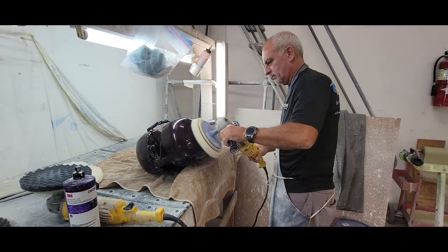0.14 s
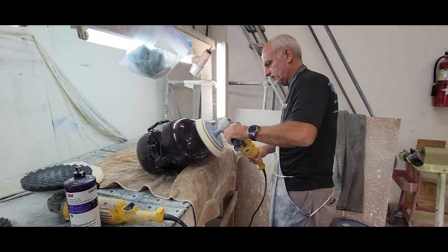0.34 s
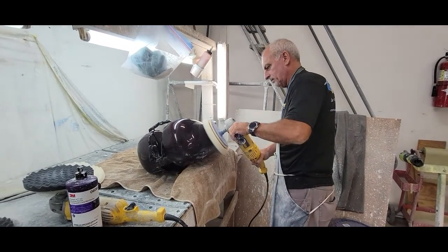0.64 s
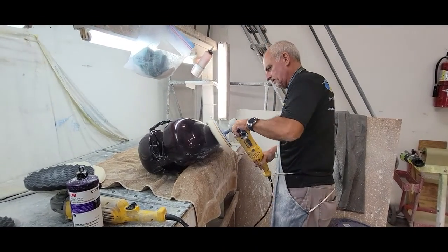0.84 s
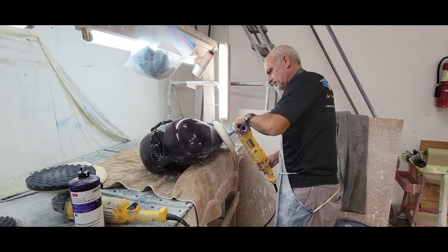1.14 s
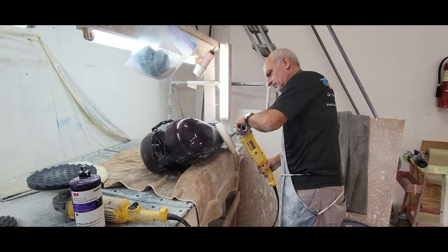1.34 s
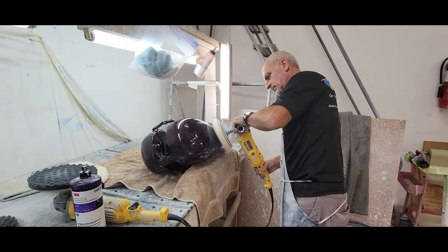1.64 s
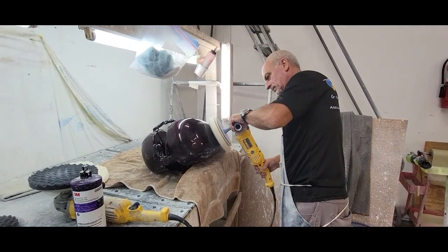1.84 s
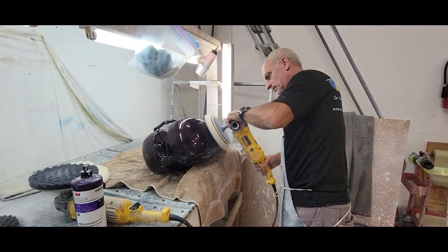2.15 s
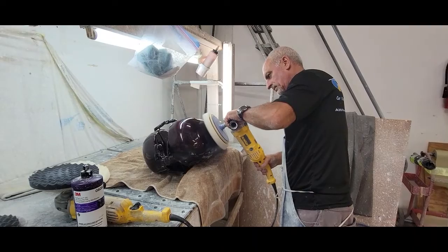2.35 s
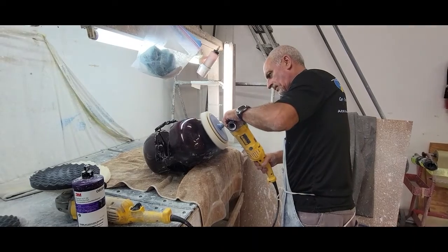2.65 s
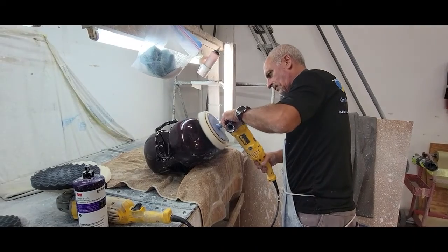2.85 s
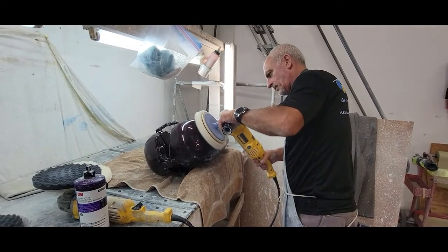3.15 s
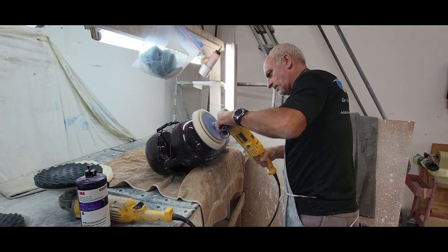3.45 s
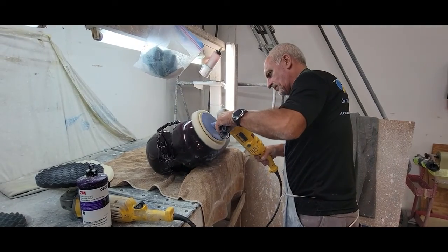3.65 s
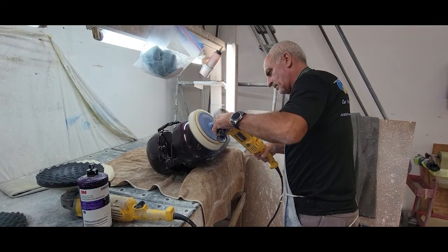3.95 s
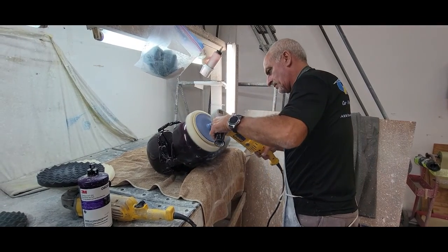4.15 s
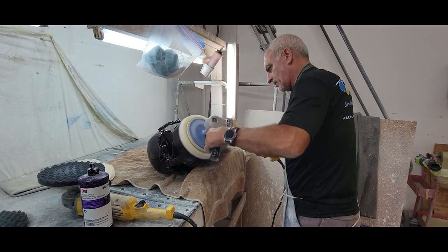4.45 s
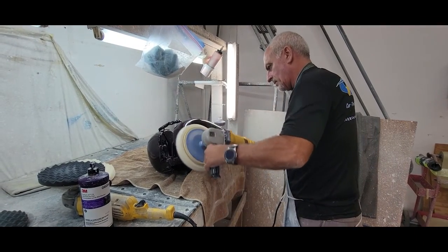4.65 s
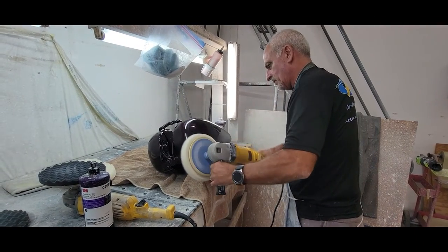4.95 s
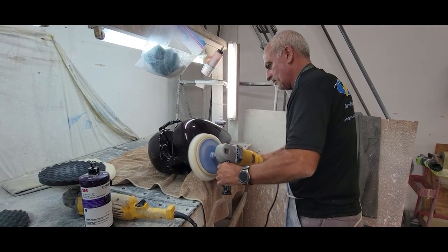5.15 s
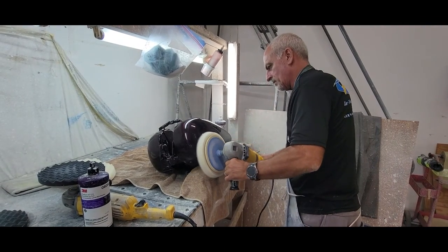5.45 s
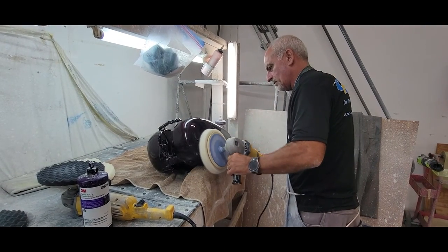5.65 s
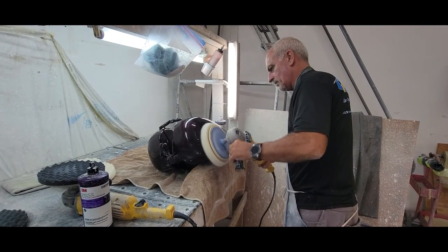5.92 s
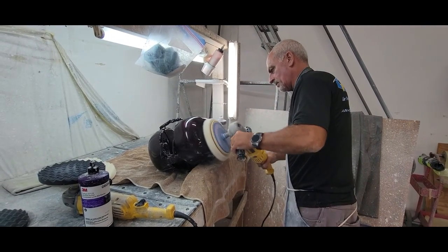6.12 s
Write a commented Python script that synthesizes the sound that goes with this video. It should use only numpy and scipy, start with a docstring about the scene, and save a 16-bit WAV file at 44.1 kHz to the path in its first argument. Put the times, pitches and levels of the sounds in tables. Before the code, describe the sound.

An electric rotary buffer is already running at full speed and continues to the cut at about 6.3 seconds. Its nasal whine, around 1250 hertz, rides on broad cooling-air rush, rough gear whir, faint low rumble and soft foam hiss that flutters rapidly with the pad. From 0 to 2 seconds the motor sags a little, recovers and sags again, the whine swelling near 1.5. Around 2.6 it almost vanishes, leaving air, a thin high whistle and a faint shell ring, then returns strongly by 3.1. From 3.3 speed climbs slightly and a second, higher whine stands out until about 4.4. As the tool swings toward the listener, gear noise thickens and a low hum swells near 4.9; speed peaks again around 5.1 to 5.4, then eases. Small hard-walled workshop, stereo microphone fairly near, tones shifting from side to side with wall reflections.

```python
"""A rotary buffer works on a painted metal shell in a small workshop; motor whine, air rush and foam hiss throughout.
0-2 s: the tool turns side-on, the motor sags under load, the main whine swells near 1.5 s.
2-4 s: the whine almost vanishes near 2.6 s and returns; speed climbs; the second whine is strong from 3.3 s.
4-6.3 s: the tool swings to face the listener, the low drone swells near 4.9 s, the speed peaks again and sags.
Tones are multiples of rotor speed with moving wall echoes; air, gears, foam and shell are shaped noise."""
import sys
import numpy as np
from scipy import signal
from scipy.fft import rfft, irfft, next_fast_len
from scipy.io import wavfile
from scipy.ndimage import map_coordinates

SR = 44100
rng = np.random.default_rng(int(sys.argv[2]) if len(sys.argv) > 2 else 0)


def to_wav(s):
    """Save 16-bit WAV."""
    ch = np.atleast_2d(s).T  # columns
    pcm = np.round(np.clip(ch, -1, 1) * 32767)  # PCM
    wavfile.write(sys.argv[1], SR, pcm.astype(np.int16))


N = 276948
TIME_S = np.arange(N) / SR
RIPPLE_HZ, ROTOR_HZ = 120, 208.5  # mains ripple; reference rotor speed
PAD_GEARING = 16.2  # rotor turns per pad turn
CUTOFF_HZ = 15750

# Levels are relative: layer trims may follow.
# motor speed as the pad is pressed: time_s, rotor_hz
SPEED = [(0.0, 207.3), (0.45, 205.4), (1.0, 206.9), (1.4, 209.8), (1.68, 205.7), (2.03, 204.2),
         (2.45, 205.1), (3.0, 207.4), (3.28, 211.4), (3.75, 212.4), (4.05, 211.2), (4.2, 209.9),
         (4.75, 208.9), (5.08, 212.0), (5.36, 211.9), (5.95, 208.5), (6.28, 208.2)]
# tool attitude: time_s, facing (0 side-on, 1 to the listener)
FACING = [(0.0, 0.46), (0.6, 0.29), (1.2, 0.057), (2.3, 0.029), (3.3, 0.2), (4.5, 0.47), (5.05, .97),
          (5.75, 1), (6.28, 0.61)]
# magnetic hum: ripple_multiple, level_db
HUM = [(1, -19.5), (2, -12.5), (3, -0.5), (4, -15.5), (5, -15)]
# low drone: time_s, level_db
DRONE = [(0.0, -44), (0.25, -43.5), (0.7, -56), (1.2, -45), (2.6, -47.5), (3.2, -43.5), (3.9, -55),
         (4.9, -37), (5.3, -43), (5.8, -38), (6.28, -44.5)]
# low shell resonances: centre_hz, half_width_hz, level_db
SHELL_MODES = [(332, 7, 3), (367, 27, -3.5), (306, 5.3, -6)]
# rubbed shell resonances: centre_hz, half_width_hz, level_db
RUB_MODES = [(453.5, 13.4, 2), (409.6, 3.4, -2.5)]
# shell ringing under the pad: time_s, level_db
SHELL_RING = [(0.0, -51), (1.3, -45), (2.0, -40.5), (2.65, -38.5), (3.2, -48), (6.28, -46.5)]
# scuffing foam resonances: centre_hz, half_width_hz, level_db
SCUFF_MODES = [(548, 100, -0.5), (735, 32, -2.5), (848, 41, -0.5)]
# pad rumble spectrum: freq_hz, density_db
RUMBLE = [(20, -22), (35, -19), (50, -1), (62, -4), (78, 2), (98, -8), (130, -6), (170, -12.5), (260, -5),
          (600, -15.5)]
# foam hiss spectrum: freq_hz, density_db
HISS = [(2500, -13), (4400, 1.5), (5300, 1), (6800, 2), (8000, -2.5), (10000, -12.5), (12500, -22)]
# finest foam sizzle spectrum: freq_hz, density_db
SIZZLE = [(7500, -6), (9500, 2), (12500, 1.5), (15500, -0.5)]
# gear resonances: centre_hz, half_width_hz, level_db
GEAR_MODES = [(1017, 70, 6), (1198, 41, 2.5), (1463, 19, -1)]
# cooling air spectrum: freq_hz, density_db
AIR = [(200, -20), (350, -22.5), (600, -12), (850, -13.5), (1100, 3.5), (1500, 0), (1800, -4.5), (2400, 1),
       (3000, -0.5), (3600, -2.5), (4100, -6), (4800, -16), (7000, -34)]
# low, middle, high vent resonance groups, each: centre_hz, half_width_hz, level_db
VENT_MODES = [
    [(2293, 158, -1), (2050, 54, -16)],
    [(2720, 150, 4), (2860, 66, -10)],
    [(3470, 160, 0)],
]
# one row per vent group: side_on_db, facing_gain_db, speed_gain_db_per_hz
VENT_LEVELS = [(-29, -8, -0.2), (-33, 2, 1.05), (-45.5, 15.5, -0.6)]
# weak rotor, gear and commutator tones: rotor_order, level_db
WEAK_ORDERS = [(4, -47.5), (8, -45), (10, -46), (14, -50), (15, -35), (16, -43.5), (24, -49), (31, -70),
               (42, -69), (72, -63)]
# overtones that follow the tool: rotor_order, side_on_db, facing_gain_db, speed_gain_db_per_hz
TURNING = [(11, -29, -16, -0.3), (13, -37, 8.5, 0.2)]
# low whine, order 5: time_s, level_db
LOWER_WHINE = [(0.0, -47), (1.85, -24), (2.4, -51), (3.1, -24), (3.45, -47), (4.6, -48), (5.3, -24.5),
               (6.28, -27.5)]
# second whine, order 7: time_s, level_db
UPPER_WHINE = [(0.0, -30), (1.05, -26), (1.5, -23), (2.95, -28.5), (3.3, -18.5), (3.7, -17), (4.4, -20),
               (5.1, -26), (5.4, -48), (5.8, -21), (6.28, -19.5)]
# octave of the main whine, order 12: time_s, level_db
OCTAVE = [(0.0, -38), (0.3, -21), (0.7, -36), (1.55, -24), (1.95, -19), (3.25, -37.5), (3.62, -20),
          (4.4, -27), (6.28, -34)]
# high whistle, order 18: time_s, level_db
WHISTLE = [(0.0, -36), (0.68, -27.5), (1.15, -36), (2.42, -38), (2.65, -20.5), (2.92, -18.5), (3.22, -47),
           (4.0, -26.5), (6.28, -40)]
# main whine, order 6, crossing standing waves: time_s, left_db, right_db, left_lead_rad
WHINE = [(0.0, -19, -16, 1.05), (0.42, -23, -18, 1.3), (0.66, -20, -21.5, 1.85), (0.8, -19, -32, 3),
         (1.02, -20, -32, 5), (1.2, -22.5, -33, 1.5), (1.46, -14, -19, 2.25), (1.7, -23.5, -25, 2.1),
         (1.84, -24, -17.3, -2.15), (2.06, -19, -14.5, -2.0), (2.28, -35, -25.5, -4), (2.6, -42, -32.5, 0),
         (2.75, -20.5, -22, 1.2), (3.1, -14.3, -13, 1.28), (3.35, -18, -25.5, 0.76),
         (3.95, -28, -16.5, 1.24), (4.7, -31, -20.5, -1.8), (5.12, -32, -14.3, -4.5),
         (5.45, -22.5, -26, -4.5), (5.68, -21.5, -24, -4.5), (6.02, -28, -24, -5), (6.28, -22, -18, -6)]
# mains sideband below the main whine: time_s, level_db
LOWER_SIDEBAND = [(0.0, -43), (0.75, -41), (1.42, -18.5), (1.9, -34), (2.8, -29), (4.15, -54),
                  (4.55, -26.5), (5.2, -22.5), (6.28, -34)]
# mains sideband above the main whine: time_s, level_db
UPPER_SIDEBAND = [(0.0, -34), (0.7, -25.5), (1.4, -32), (1.8, -36), (3.1, -31), (3.5, -27), (4.5, -24),
                  (5.2, -40), (6.28, -28)]


def from_db(db):
    """Decibels to amplitude gain."""
    return 10 ** (np.asarray(db) / 20)


def rms_one(x):
    """Scale to unit rms."""
    return x / np.sqrt(np.mean(np.abs(x) ** 2) + 1e-20)


def in_time(rows):
    """Interpolate each column of a curve to every sample."""
    time_s, *columns = np.transpose(rows)
    return [np.interp(TIME_S, time_s, column) for column in columns]


def gain_along(curve):
    """Gain at every sample from a time_s, level_db curve."""
    return from_db(in_time(curve)[0])


def following(db, facing_db, speed_db=0):
    """Gain that follows tool attitude and rotor speed (speed_db in dB per Hz off ROTOR_HZ)."""
    facing, = in_time(FACING)
    speed_hz, = in_time(SPEED)
    return from_db(db + facing_db * facing + speed_db * (speed_hz - ROTOR_HZ))


def pan(left_over_right_db):
    """Left and right gains for a level difference."""
    return from_db(np.array([[left_over_right_db], [-left_over_right_db]]) / 2)


def drift(rate_hz):
    """Unit-rms slow random signal: noise through two equal poles at rate_hz."""
    step, settle = 40, 2000  # samples per slow point; slow points dropped
    pole = np.exp(-2 * np.pi * rate_hz * step / SR)
    noise = rng.standard_normal(N // step + settle + 2)
    slow = signal.lfilter([1], [1, -2 * pole, pole * pole], noise)[settle:]
    return np.interp(np.arange(N) / step, np.arange(len(slow)), rms_one(slow))


def coloured(spectrum):
    """Response along a spectrum, falling at 12 dB per octave beyond its ends."""
    points_hz, db = np.transpose(spectrum)

    def gain_at(hz):
        ends = np.minimum(1, np.minimum(hz / points_hz[0], points_hz[-1] / hz)) ** 2
        return ends * from_db(np.interp(np.log(hz), np.log(points_hz), db))
    return gain_at


def ringing(modes):
    """Summed response of resonances; the width division evens their noise power."""
    def gain_at(hz):
        return sum(from_db(db) / np.sqrt(width_hz) / (1 + ((hz - centre_hz) / width_hz) ** 2)
                   for centre_hz, width_hz, db in modes)
    return gain_at


def shaped_noise(gain_at, alike, lead_rad=0):
    """Unit-rms stereo noise; alike sets left-right correlation before the left phase lead."""
    size = next_fast_len(N)
    hz = np.maximum(np.arange(size // 2 + 1) * SR / size, 1)
    spectra = rfft(rng.standard_normal((2, size))) * gain_at(hz)
    mid, side = spectra * np.sqrt([[1 + alike], [1 - alike]])
    ears = np.array([(mid + side) * np.exp(1j * lead_rad), mid - side])
    return rms_one(irfft(ears, size)[:, :N])


def whirring(gain_at, alike):
    """Noise partly repeating each rotor turn: blurred lines on orders, flanked by mains sidebands."""
    def line(hz):
        off_line_hz = ((hz / ROTOR_HZ + .5) % 1 - .5) * ROTOR_HZ
        return 1 / (1 + (off_line_hz / 10) ** 2)

    def combed(hz):
        sidebands = line(hz - RIPPLE_HZ) + line(hz + RIPPLE_HZ)
        return gain_at(hz) * np.sqrt(1 + 11 * line(hz) + 4.5 * sidebands)
    return shaped_noise(combed, alike, lead_rad=0.36)


def echoes(share, rate_hz):
    """Complex gain per ear: direct path plus a power share of wall echoes that shift with the tool."""
    scattered = np.array([drift(rate_hz) + 1j * drift(rate_hz) for ear in range(2)])
    return np.sqrt(1 - share) + np.sqrt(share / 2) * scattered


def standing_waves():
    """Wandering interaural lead as a tone moves through the room."""
    lead_rad = 1.3 * drift(.8)
    turn = np.exp(1j * lead_rad / 2)
    return np.array([turn, turn.conj()])


def tone(angle, gain):
    """Sine of unit rms, random start phase, under a complex gain."""
    angle = angle + rng.uniform(0, 2 * np.pi)
    return np.sqrt(2) * (gain.real * np.cos(angle) - gain.imag * np.sin(angle))


def read_at(x, samples):
    """Read both ears at moving sample positions."""
    return np.array([map_coordinates(ear, [samples], order=1, mode="mirror") for ear in x])


def near_walls(x):
    """Shell, bench and wall echoes shift with the tool and carve wandering notches."""
    delays_s, echo_gain = (.0023, .0061, .0137), .42
    bounced = sum(read_at(x, (TIME_S - delay_s - .00025 * drift(.7)) * SR) for delay_s in delays_s)
    return (x + echo_gain * bounced) / np.sqrt(1 + len(delays_s) * echo_gain ** 2)


def rotation():
    """Rotor, pad and mains ripple angles; the pad drags twice a turn and shakes the rotor."""
    speed_hz, = in_time(SPEED)
    rotor = 2 * np.pi * np.cumsum(speed_hz + .15 * drift(14)) / SR
    pad = rotor / PAD_GEARING
    backlash_rad = .025 * drift(35)
    drag_rad = 0.013 * np.sin(2 * pad)
    return rotor + backlash_rad + drag_rad, pad, 2 * np.pi * RIPPLE_HZ * TIME_S


def drone(mains):
    """Magnetic hum on ripple multiples plus low modes of the pressed shell."""
    ears = np.exp(1j * np.array([[1.2], [0]]))  # left leads, rad
    hum = sum(from_db(db) * tone(multiple * mains, ears * echoes(share=0.14, rate_hz=4.1))
              for multiple, db in HUM)
    shell = from_db(-5.0) * shaped_noise(ringing(SHELL_MODES), alike=1.0, lead_rad=0.94)
    return gain_along(DRONE) * (from_db(-2.5) * hum + shell) * pan(-3.5)


def foam_pad(pad):
    """Foam friction: hiss surging each pad turn, shell ringing, scuff and rumble."""
    shared_surge = .5 * drift(10) + 0.34 * np.cos(pad + 1.9 * drift(6.8))
    surge = shared_surge + 0.5 * np.array([drift(10.0), drift(7.3)])  # plus one per ear
    grain_db = .9 * drift(300)

    hiss = following(db=-35.0, facing_db=4, speed_db=0.04) * from_db(1.56 * surge)
    hiss = hiss * shaped_noise(coloured(HISS), alike=0.018) * pan(.4)

    sizzle = following(db=-43.5, facing_db=1.0) * from_db(2.0 * surge + grain_db)
    sizzle = sizzle * shaped_noise(coloured(SIZZLE), alike=.02) * pan(0.76)

    ring = gain_along(SHELL_RING) * shaped_noise(ringing(RUB_MODES), alike=1.0, lead_rad=1.6)
    scuff = following(db=-41.5, facing_db=-6)
    scuff = scuff * shaped_noise(ringing(SCUFF_MODES), alike=0.44, lead_rad=1.0)

    rumble = following(db=-46, facing_db=-4.5, speed_db=0.3)
    rumble = rumble * shaped_noise(coloured(RUMBLE), alike=0.87) * pan(-1.7)
    return hiss + sizzle + (ring + scuff) * pan(-3.5) + rumble


def housing(rotor, pad, mains):
    """Gear rattle and cooling air ring in the housing, chopped by rotor and mains; the pad flutters the vents."""
    mains_chop = 0.036 * np.cos(mains) + 0.037 * np.cos(2 * mains)
    chop = rms_one(1 + mains_chop + 0.14 * np.cos(rotor) + 0.051 * drift(27))
    flutter = rms_one(1 + 0.27 * np.cos(2 * pad + 1.45 * drift(4.0)))

    gears = following(db=-41, facing_db=10.5, speed_db=-0.3)
    gears = gears * whirring(ringing(GEAR_MODES), alike=0.47) * pan(-9.0)

    rush = following(db=-24.0, facing_db=0.95, speed_db=-0.02)
    rush = rush * whirring(coloured(AIR), alike=0.13) * pan(-2.8)

    vents = sum(following(*law) * whirring(ringing(modes), alike=0.66)
                for modes, law in zip(VENT_MODES, VENT_LEVELS))
    vents = flutter * vents * pan(-0.88)

    travel_samples = rotor / (2 * np.pi * ROTOR_HZ) * SR  # noise lines track motor speed
    return chop * near_walls(read_at(gears + rush + vents, travel_samples))


def overtones(rotor, pad, mains):
    """Rotor orders throb with mains and pad; the rotor's imbalance hums without that throb."""
    mains_throb = 0.14 * np.cos(mains) + 0.2 * np.cos(2 * mains)
    throb = rms_one(1 + mains_throb + 0.19 * np.cos(2 * pad))

    curves = [(5, LOWER_WHINE), (7, UPPER_WHINE), (12, OCTAVE), (18, WHISTLE)]
    orders = [(order, gain_along(curve)) for order, curve in curves]
    orders += [(order, following(*law)) for order, *law in TURNING]
    strong = sum(gain * tone(order * rotor, standing_waves() * rms_one(echoes(share=0.18, rate_hz=4.2)))
                 for order, gain in orders)
    weak = sum(from_db(db) * tone(order * rotor, rms_one(echoes(share=0.99, rate_hz=1.9)))
               for order, db in WEAK_ORDERS)

    imbalance = following(db=-52.5, facing_db=-5.5) * tone(rotor, echoes(share=0.15, rate_hz=3.1))
    return throb * (from_db(-6.5) * strong + from_db(-5.5) * weak) + imbalance


def whine(rotor, pad, mains):
    """Main tone, six cycles per rotor turn, with sidebands from the mains-pulsed torque."""
    left_db, right_db, lead_rad = in_time(WHINE)
    wobble = 1 + 0.1 * np.cos(2 * pad) + 0.11 * drift(20)
    paths = from_db([left_db, right_db]) * np.exp(1j * np.array([lead_rad, -lead_rad]) / 2)
    whine_angle = 6 * rotor
    out = tone(whine_angle, paths * wobble)
    for sign, curve in ((-1, LOWER_SIDEBAND), (1, UPPER_SIDEBAND)):
        room = standing_waves() * rms_one(echoes(share=0.35, rate_hz=2.1))
        sideband = tone(whine_angle + sign * mains, room * wobble)
        out += from_db(-4.0) * gain_along(curve) * sideband
    return out


def scene():
    """One rotation drives every layer."""
    rotor, pad, mains = rotation()
    background = drone(mains) + foam_pad(pad) + housing(rotor, pad, mains)
    return background + overtones(rotor, pad, mains) + whine(rotor, pad, mains)


def record(dry):
    """Steep elliptic low-pass at CUTOFF_HZ."""
    low_pass = signal.ellip(12, .1, 90, CUTOFF_HZ, fs=SR, output="sos")
    return signal.sosfilt(low_pass, dry)


dry = scene()
out = record(dry)
to_wav(out)
```